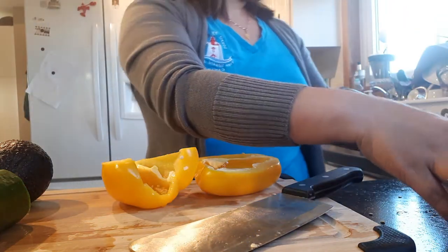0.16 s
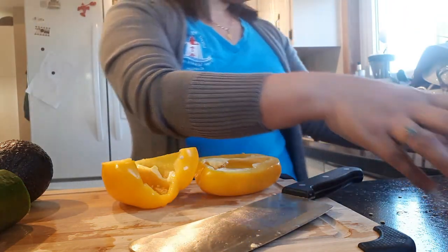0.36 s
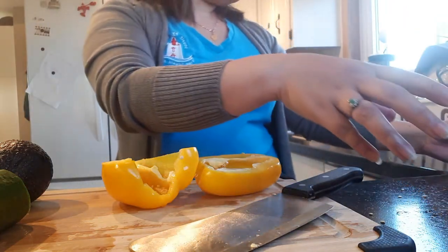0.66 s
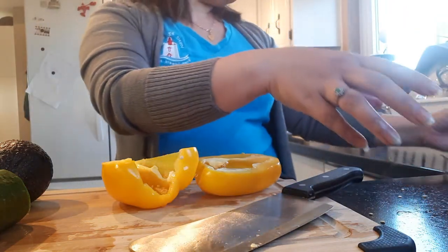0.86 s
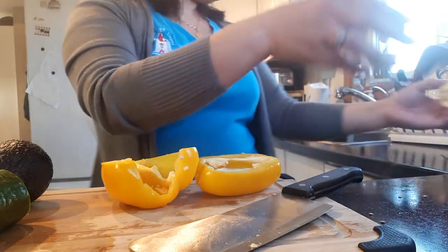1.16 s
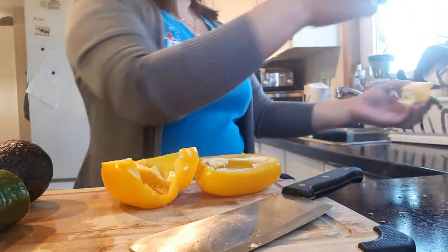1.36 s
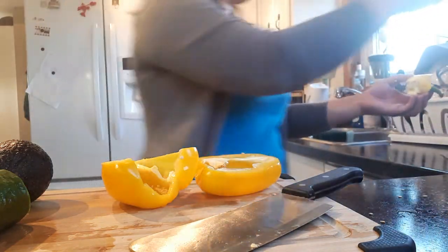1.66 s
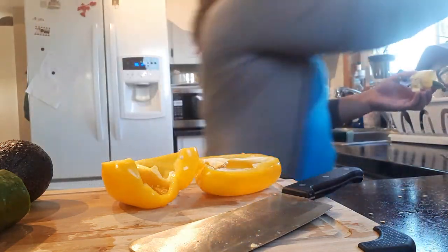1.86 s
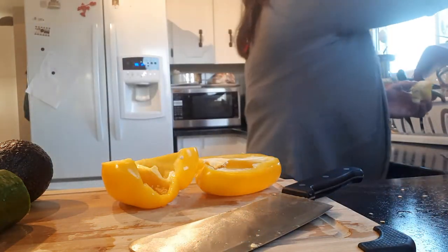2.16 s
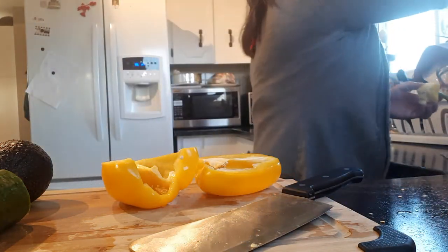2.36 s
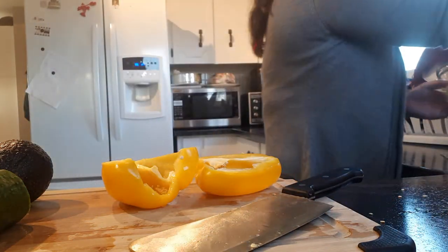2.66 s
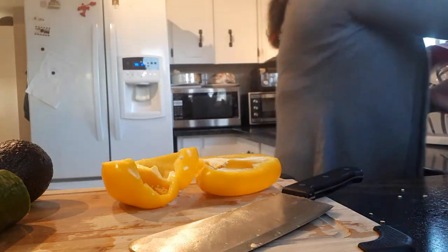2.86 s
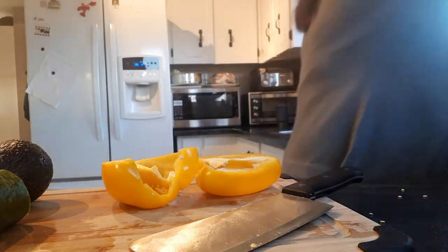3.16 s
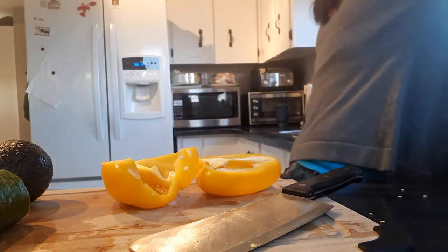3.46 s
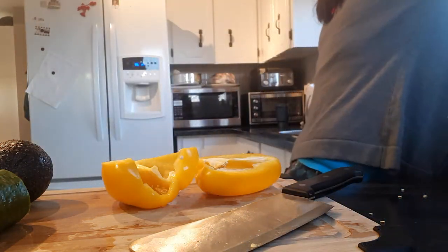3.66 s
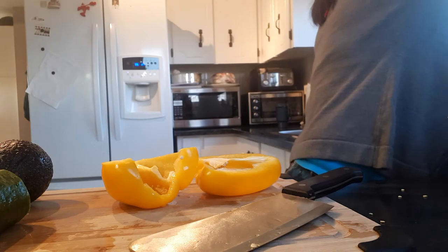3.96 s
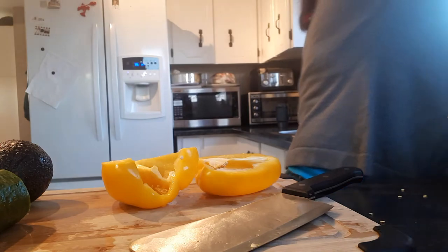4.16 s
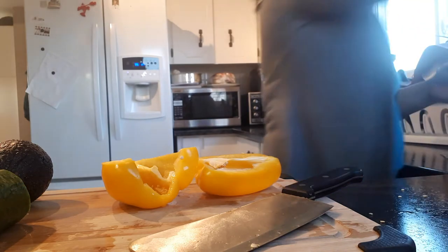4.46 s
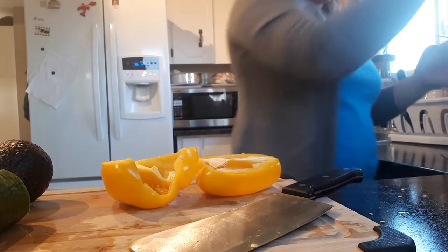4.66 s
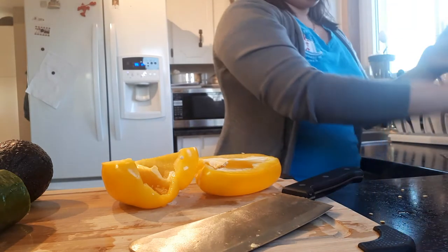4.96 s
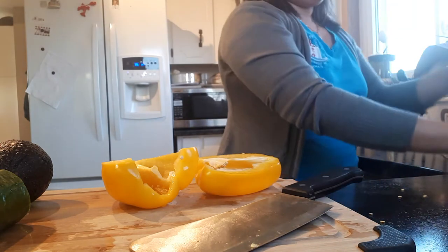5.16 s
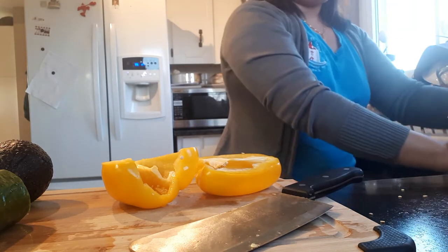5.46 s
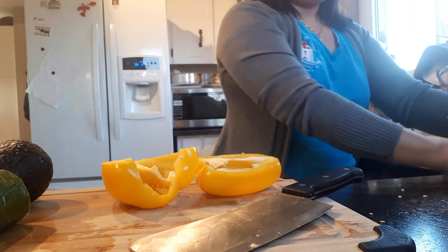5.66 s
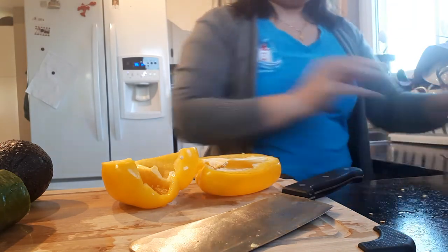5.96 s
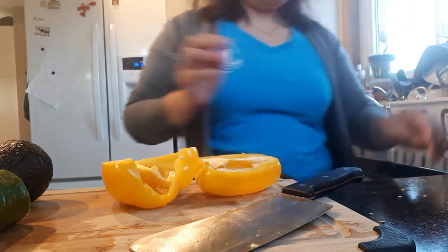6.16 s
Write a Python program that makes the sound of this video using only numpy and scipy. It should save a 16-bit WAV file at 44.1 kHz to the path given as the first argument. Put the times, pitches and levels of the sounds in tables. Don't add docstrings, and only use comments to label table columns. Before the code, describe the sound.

A faint low appliance hum and soft hiss run throughout a lively home kitchen, heard by two spaced microphones close on the counter. From 0 to 0.75 s a thin, fluttering tap jet hisses, then shuts with a tiny metallic click. Soft, dull drain gurgles blip irregularly, densest until about 1.9 s and sparser later. Around 2.1 s cloth brushes; at 2.2-2.4 s a cupboard opens with hollow low thumps and ringing panels. Light touches and faint rustling follow. At 3.57-3.72 s a bin is struck in a tight cluster of woody knocks with a short plastic crinkle and steel rattle, then handling fades by 4.1 s. From 4.65 to 5.05 s a hinge gives a rough, bright squeak, easing off. At 5.08 s the door slams very loudly, rebounding at 5.13 s with a short boom. Small clicks follow to 5.5 s; a moderate counter knock lands at 5.66 s, a tiny nail tick at 5.82 s, then hum until 6.3 s.

```python
import sys
import numpy as np
from scipy import signal
from scipy.fft import rfft, irfft
from scipy.io import wavfile

SR = 44100
rng = np.random.default_rng(int(sys.argv[2]) if len(sys.argv) > 2 else 0)


def field_ratio(decibels):
    return 10 ** (np.asarray(decibels, dtype=float) / 20)


def file_out(sig):
    cols = np.atleast_2d(sig).T
    lim = np.clip(cols, -1, 1)
    pcm = np.round(lim * 32767).astype(np.int16)
    wavfile.write(sys.argv[1], SR, pcm)


N = 277958

# f/Hz, density/dB per Hz
HUM_SPECTRUM = [(13, -47), (22, -30.5), (49, -13.5), (76, -43.5), (139, -0.5), (210, -9), (276, -7),
                (465, -6.5), (665, -10.5), (900, -33.5), (977, -23), (1220, -29.5), (2360, -36),
                (5230, -45.5), (15700, -46)]
# t/s, level/dB
HUM_LEVEL = [(0.0, -53.5), (1.02, -57), (1.16, -54.5), (1.9, -55), (2.88, -57.5), (3.45, -56.5),
             (3.7, -54.5), (4.14, -57.5), (4.37, -61.5), (4.65, -55), (5.03, -60.5), (5.4, -60.5),
             (5.84, -62), (6.3, -54)]
# t/s, jet level/dB
TAP_FLOW = [(0.0, -78), (0.038, -73), (0.098, -62.5), (0.15, -59), (0.29, -65), (0.366, -58.5),
            (0.634, -60), (0.69, -66), (0.75, -78)]
# f/Hz, density/dB per Hz
TAP_SPECTRUM = [(530, -41), (900, -5), (990, -3), (1260, -6.5), (1520, 3), (2340, -1.5), (5220, -1.5),
                (9160, -10), (11800, -7.5), (15700, -12)]
# t/s, peak level/dB, weight/dB, hardness/dB
THUMPS = [
    (0.036, -36, -4.5, 9.5),
    (2.205, -28, -1, -26),
    (2.267, -27.5, -5.5, 7),
    (2.394, -36.5, -4, -1),
    (3.065, -44.5, -1.5, 19.5),
    (3.571, -22.5, -3, 12),
    (3.929, -36.5, -1, -2),
    (5.661, -24.5, -0.5, -24),
]
# t/s, peak level/dB, weight/dB, hardness/dB
KNOCKS = [(0.829, -36.5, -15, 10.5), (1.024, -47, -3, -10), (1.32, -46.5, -12, -1), (2.299, -34, 3, -10),
          (3.603, -17.5, 2.5, 9.5), (3.639, -17.5, -1.5, 1), (3.667, -34, 2, 0), (3.713, -27, -5, 6),
          (5.635, -46, 7, 16), (5.774, -58, -2, 4), (5.82, -49, 15.5, -9)]
# t/s, peak level/dB, weight/dB, hardness/dB
CLICKS = [
    (0.757, -44, -3, 24),
    (2.491, -46.5, -8, 5.5),
    (3.43, -45.5, -8, -1.5),
    (5.334, -33, 12.5, -14),
    (5.431, -34.5, -12, -10.5),
    (5.481, -36.5, 3, -1),
    (5.709, -44.5, 10, -1),
]
# t/s, peak level/dB, weight/dB, hardness/dB
SLAM = [
    (5.080, 3, -1.5, 1),
    (5.086, -10, -8, 4),
    (5.095, -15.5, 8, 4.5),
    (5.102, -15.5, -2, 3.5),
    (5.115, -19, -13, 2),
    (5.134, -3, 0.5, 3),
    (5.143, -16, -7, -9),
    (5.152, -23.5, -13.5, 3.5),
]
BLOW_EDGES_HZ = [130, 420, 1400, 4000, 15500]
SLAM_EDGES_HZ = [150, 500, 1400, 2800, 14500]
# f/Hz, level/dB, T60/s
DOOR_MODES = [(134.8, -12, 1), (212.5, -15.5, 0.37), (590, -7, 0.56), (685, -6, 0.32), (1054, -17.5, 1.1),
              (1032, 7, 1.4), (1183, -4, 0.043), (1372, 6.5, 0.17), (1680, -12, 0.059), (1876, 5.5, 0.11),
              (2150, -6, 0.17), (2554, -3.5, .2)]
# t/s, peak level/dB, f/Hz
GURGLES = [(0.054, -35, 192), (0.253, -44.5, 666), (0.38, -44.5, 138), (0.551, -35.5, 720),
           (0.62, -49, 188), (0.829, -43.5, 205), (1.024, -35, 324), (1.081, -38, 320), (1.179, -48, 648),
           (1.266, -42.5, 643), (1.322, -41, 282), (1.43, -37.5, 374), (1.547, -36, 512), (1.759, -38, 278),
           (1.815, -35.5, 294), (1.914, -38.5, 186), (2.397, -34, 260), (2.587, -45, 316),
           (2.633, -40.5, 387), (2.67, -42.5, 510), (3.033, -40.5, 502), (3.151, -42, 280),
           (3.212, -50, 487), (3.387, -44, 255), (3.453, -39, 285), (4.084, -40.5, 124), (4.321, -41, 265),
           (4.44, -34.5, 311), (5.844, -39, 242), (6.179, -43, 186)]
# f/Hz, level/dB, T60/s
PIPE_MODES = [(678, 2, 0.093), (958, -15.5, 0.086), (501, -4, .07), (303, -1, 0.059)]
# t/s, peak level/dB
PIPE_KNOCKS = [(0.125, -49), (0.258, -48.5), (0.552, -37.5), (0.615, -44.5), (0.712, -56), (0.941, -45.5),
               (1.024, -50), (1.089, -50), (1.182, -48), (1.264, -43.5), (1.322, -52), (1.393, -56),
               (1.433, -48), (1.479, -49), (1.553, -58), (1.598, -48.5), (1.642, -57), (1.819, -51),
               (1.912, -50), (3.007, -57), (5.974, -54)]
# f/Hz, strike level/dB, rebound level/dB, T60/s
DOOR_NEAR = [(132, -22, -22, 0.21), (206, -16.5, -21.5, 0.31), (285, -17.5, -22.5, .2),
             (340, -15.5, -20.5, .22), (430, -11.5, -25, 0.22), (583, -24.5, -18, .2),
             (696, -21, -22, 0.22), (974, -14.5, -17, .25), (1110, -19, -15, 0.17), (1275, -21, -24.5, .27),
             (1360, -20, -24, 0.25), (1823, -17, -23.5, .22), (2000, -19, -26, 0.2),
             (2500, -20.5, -25.5, .14)]
# t/s, f/Hz, level/dB, T60/s
CARCASS = [(5.0813, 218, -14, .09), (5.092, 124, -12.5, .16), (5.083, 2050, -18, .04),
           (5.107, 270, -16, .1), (5.083, 3000, -28, .06), (5.082, 3800, -30, .05), (5.1, 1815, -21, .08),
           (5.175, 237, -21.5, .12), (5.21, 319, -31, .2), (5.22, 1287, -32, .25), (5.082, 340, -7.5, .025),
           (5.097, 415, -10, .1), (5.102, 1037, -17, .08), (5.113, 370, -13, .08),
           (5.135, 3750, -27.5, .03), (5.205, 1100, -33, .25), (5.23, 1794, -36, .2),
           (5.255, 1006, -39, .1)]
# t/s, f/Hz, level/dB, T60/s
NEAR_STRIKES = [(.765, 2500, -50, .06), (.762, 2200, -54, .04), (.76, 6900, -49, .03), (2.19, 211, -32, 0.17),
                (2.207, 323, -35, 0.12), (2.222, 482, -38, .15), (2.264, 122.1, -22, 0.25),
                (2.268, 2460, -34, .05), (2.268, 2800, -39, .04), (2.268, 773, -39, 0.14), (2.24, 526, -35, 0.11),
                (2.225, 1420, -41, 0.17), (2.268, 450, -34.5, 0.13), (2.299, 190.2, -31.5, 0.25),
                (2.302, 119, -27, 0.13), (2.3, 520, -36, .12), (2.397, 272, -35.5, 0.085), (3.553, 388, -31, 0.2),
                (3.57, 203, -25, 0.16), (3.572, 653, -27.5, 0.099), (3.602, 205, -18.5, 0.15),
                (3.602, 362, -29, 0.074), (3.604, 953, -26.5, 0.13), (3.605, 1370, -32, 0.21),
                (3.634, 203, -23, .12), (3.635, 490, -35, .08), (3.573, 2500, -33, .05), (3.632, 816, -27, 0.13),
                (3.635, 2840, -32, 0.066), (3.652, 119.6, -26, 0.24), (3.66, 1104, -34, 0.088),
                (3.705, 126, -29, 0.18), (3.72, 942, -38, .15), (3.722, 1770, -46, .12), (5.649, 200, -33, 0.086),
                (5.652, 484, -31, 0.064), (5.661, 332, -16, 0.057), (5.662, 1017, -33, .1),
                (5.663, 720, -34, 0.088), (5.664, 1310, -42.5, 0.077), (5.665, 134, -30.5, 0.27),
                (5.673, 522, -24.5, 0.067), (5.687, 430, -28, 0.11), (5.7, 218, -36, 0.22),
                (5.76, 692, -48, 0.24), (5.82, 239.4, -43.5, 0.22),
                (.775, 2550, -48, .07), (.822, 2300, -50, .09), (.832, 1450, -50, .05), (3.61, 2600, -34, .12),
           (3.735, 930, -36, .08), (3.725, 1780, -42, .15), (3.86, 1000, -42, .1), (5.65, 1700, -47, .03),
           (5.659, 2050, -39, .05), (5.675, 1500, -38, .04), (.76, 9050, -59, .5), (5.638, 5280, -62, .15),
           (5.725, 5280, -61, .15), (5.848, 660, -43, .15), (5.821, 7600, -41, .008),
           (5.821, 6400, -46, .008), (5.821, 12000, -38, .006), (5.772, 5000, -57, .012)]
# f/Hz, left minus right level/dB
NEAR_PAN = [(60, 0.5), (180, -1.0), (550, 2.0), (1650, -1.0), (4970, 2.5), (15000, 1.5)]
# t/s, peak level/dB, swell/s, fade/s
BOOMS = [(.212, -30.5, 0.042, 0.034), (.33, -62, 0.12, .3), (.55, -30.5, 0.013, 0.054),
         (2.2, -35.5, 0.027, 0.22), (2.298, -26.5, 0.041, 0.16), (2.508, -36, 0.038, 0.16),
         (3.584, -25, 0.13, 0.084), (3.65, -27.5, 0.046, 0.17), (3.845, -27, 0.17, 0.15),
         (4.102, -33.5, 0.22, 0.16), (4.49, -32, 0.036, 0.076), (4.68, -52, 0.34, .05),
         (5.11, -19, 0.014, 0.15), (5.17, -17.5, 0.058, 0.029), (5.678, -28.5, 0.043, 0.12),
         (5.95, -46, 0.086, .02)]
# t/s, peak level/dB, swell/s, fade/s
SHAKES = [
    (.264, -64, .09, 0.23),
    (2.17, -71, .03, .1),
    (2.378, -57, .12, 0.072),
    (2.5, -66, 0.096, 0.51),
    (3.61, -70, .1, .09),
    (3.994, -71, .2, 0.37),
    (4.46, -60, 0.038, 0.14),
    (4.68, -70, 0.24, .05),
    (5.11, -47.5, 0.011, 0.19),
    (5.69, -50.5, 0.019, .17),
]
# t/s, f/Hz, level/dB, touch/s
STEEL_TOUCHES = [(.815, 2150, -37.5, 0.021), (1.03, 1570, -45.5, 0.069), (1.17, 1520, -48.5, 0.045),
                 (1.33, 1606, -50, 0.072), (1.47, 1490, -51.5, 0.018), (1.96, 1460, -42, 0.11),
                 (2.267, 2500, -43, 0.0031), (2.8, 2400, -55, .06), (3.01, 1580, -56, .05),
                 (3.573, 2440, -27.5, 0.0023), (3.72, 1780, -40, 0.019), (3.84, 970, -33.5, 0.14),
                 (3.86, 2550, -53, 0.083), (3.93, 2820, -48, .023), (3.96, 1577, -42.5, 0.1),
                 (4.58, 1710, -57, 0.072), (5.64, 5210, -50, 0.027), (5.661, 2033, -39, 0.0054),
                 (5.66, 1030, -33, 0.0103), (5.659, 343, -29, 0.0045), (5.66, 1550, -35, 0.015),
                 (5.71, 5250, -57, 0.015)]
# t/s, f/Hz, level/dB, touch/s
TAP_STEEL = [
    (.77, 9050, -52, .03),
]
# t/s, f/Hz, level/dB, touch/s
SHELVES = [
    (5.083, 200, -23, .01),
    (5.09, 1000, -18.5, 0.0088),
    (5.083, 1990, -19.5, 0.0041),
    (5.088, 1770, -19.5, .02),
    (5.135, 1140, -19.5, 0.0074),
    (3.6, 195, -30, 0.029),
    (2.205, 338, -30.5, 0.032),
]
# t/s, f/Hz, level/dB, touch/s
NAIL_TICK = [
    (5.821, 12000, -49, 0.00026),
    (5.821, 7000, -43, 0.00012),
]
# t/s, peak level/dB, swell/s, fade/s, brightness/dB
RUBS = [(.772, -48, 0.013, 0.12, -1), (1.034, -65, .04, .32, -8.5), (1.32, -62.5, 0.04, 0.23, -9),
        (2.072, -47.5, .11, 0.32, -9), (2.212, -45, 0.046, 0.14, 0.5), (2.268, -42, 0.0092, 0.055, -13),
        (2.47, -59.5, 0.67, 0.031, -10), (2.64, -75, 0.033, 0.13, -7), (2.86, -62.5, 0.093, 0.081, -8),
        (3.07, -70, .1, 0.13, 1), (3.22, -69.5, 0.033, 0.53, -3.5), (3.438, -64.5, 0.03, 0.57, -1.5),
        (3.578, -37.5, 0.013, 0.13, -1.5), (3.615, -31, 0.035, 0.078, -6.5), (3.66, -48, 0.056, 0.11, -9),
        (3.978, -52, 0.11, 0.089, -5), (4.4, -66.5, 0.52, 0.74, -6), (5.82, -84, .02, 0.32, -3),
        (6.21, -77, .04, 0.1, -4)]
# f/Hz, density/dB per Hz
RUB_SPECTRUM = [(470, -50), (800, -3), (1780, -8.5), (1930, -13.5), (2860, -2.5), (7190, -11.5),
                (8850, -10.5), (11000, -11), (13400, -23.5), (15000, -33)]
# t/s, peak level/dB, swell/s, fade/s
CRINKLES = [
    (2.2, -42, 0.012, 0.15),
    (2.27, -50, .006, 0.046),
    (3.078, -67, .02, .06),
    (3.438, -70, .03, .1),
    (3.612, -33, .01, .025),
]
# t/s, level/dB
HINGE_FRICTION = [
    (4.55, -98),
    (4.64, -87),
    (4.675, -52),
    (4.72, -50.5),
    (4.8, -54),
    (4.86, -56),
    (4.97, -61),
    (5.03, -66),
    (5.076, -65),
]
# f/Hz, width/Hz, level/dB
HINGE_BODY = [(980, 47, -5), (1622, 270, -4.5), (2030, 400, 1), (2380, 280, 3.5), (3250, 200, -3),
              (3640, 260, 0), (4200, 220, 0), (5290, 220, -13), (5630, 66, -12.5), (6730, 280, -14.5),
              (8050, 230, -33)]
# low f/Hz, high f/Hz, level/dB, sounding until t/s
HINGE_EARLY = [
    (900, 1080, -11, 4.84),
    (1450, 1950, -4, 4.85),
    (3400, 4400, -5, 4.8),
]
# t/s, level/dB, f/Hz
WHINE = [
    (4.44, -75, 1480),
    (4.5, -72, 1500),
    (4.6, -70, 1680),
    (4.67, -60, 1780),
    (4.71, -66, 1790),
]
# f/Hz, correlation/1
LIKENESS = [(30, .95), (130, .95), (290, .6), (640, -.03), (1400, -.15), (3000, 0), (15000, 0)]
# f/Hz, T60/s
ROOM_T60 = [(60, 0.073), (250, 0.24), (1000, 0.42), (3000, 0.48), (8000, 0.35), (15000, 0.2)]
# f/Hz, gain/dB
MICROPHONE = [(20, -25.5), (60, -15.5), (110, -4.5), (4000, -3.5), (7600, -2), (8500, -13.5), (12000, -13),
              (16000, -17)]

THUMP_DB, KNOCK_DB = (6.5, -11, -7.5, -16.5), (-6, -2.5, -14, -14.5)
CLICK_DB, SLAM_DB = (-12.5, -14.5, -3.5, -7.5), (-11.5, -9.5, -5.5, -19)


def rms_one(x):
    return x / np.sqrt(np.mean(x ** 2) + 1e-20)


def in_time(table):
    first, last = table[0], table[-1]
    rows = [(first[0] - .02, -120, *first[2:]), *table, (last[0] + .004, -120, *last[2:])]
    s, *columns = np.transpose(rows)
    return [np.interp(np.arange(N) / SR, s, c) for c in columns]


def at_hz(points, hz):
    point_hz, value = np.array(points).T
    return np.interp(np.log(hz), np.log(point_hz), value)


def band(x, low_hz, high_hz):
    sos = signal.butter(2, [low_hz, min(high_hz, .45 * SR)], "band", fs=SR, output="sos")
    return signal.sosfilt(sos, x)


def drift(rate_hz):
    r = np.exp(-80 * np.pi * rate_hz / SR)
    white = rng.standard_normal(N // 40 + 2002)
    slow = signal.lfilter([1], [1, -2 * r, r * r], white)[2000:]
    return np.interp(np.arange(N) / 40, np.arange(len(slow)), rms_one(slow))


def ring(clicks, hz, t60_s):
    r, w = field_ratio(-60 / (t60_s * SR)), 2 * np.pi * hz / SR
    return signal.lfilter([0, np.sin(w)], [1, -2 * r * np.cos(w), r * r], clicks + 1e-18)


def stereo_noise():
    mid, side = rfft(rng.standard_normal((2, N)))
    alike = np.clip(at_hz(LIKENESS, np.arange(len(mid)) * SR / N + 1), -1, 1)
    both = np.sqrt(1 + alike) * mid + np.sqrt(1 - alike) * side * [[1], [-1]]
    return irfft(both, N) / np.sqrt(2)


def colour(x, spectrum):
    tones = rfft(x)
    hz = np.arange(tones.shape[-1]) * SR / N + 1
    return irfft(tones * field_ratio(at_hz(spectrum, hz)), N)


def swells(table):
    s, db, swell_s, fade_s = np.array(table).T[:4, :, None]
    t = np.arange(0, N + 32, 32) / SR - s
    slope = np.minimum(t / np.maximum(swell_s, 1e-3), -t / np.maximum(fade_s, 1e-3))
    return field_ratio(db + 20 * slope)


def at_samples(gains):
    return np.interp(np.arange(N) / 32, np.arange(gains.shape[1]), gains.sum(axis=0))


def hum():
    noise = rms_one(colour(stereo_noise(), HUM_SPECTRUM))
    low = signal.sosfilt(signal.butter(2, 1100, fs=SR, output="sos"), noise)
    lumps_db = 2.5 * drift(24)
    level_db = 4.0 + np.interp(np.arange(N) / SR, *np.transpose(HUM_LEVEL))
    return field_ratio(level_db + lumps_db) * low + field_ratio(-53.0) * (noise - low)


def tap():
    jet_db, = in_time(TAP_FLOW)
    low_db = -3.5 + 0.98 * np.clip(-65.0 - jet_db, 0, 20)
    hiss = colour(stereo_noise(), TAP_SPECTRUM)
    jet = rms_one(band(hiss, 2300, 7600))
    jet = jet - field_ratio(-8.5) * rms_one(band(hiss, 8000, 16500))
    jet = jet + field_ratio(low_db) * rms_one(band(hiss, 900, 3200))
    left_right = field_ratio([[1.3], [-1.3]])
    return field_ratio(jet_db + 4.5 + 1.0 * drift(13)) * jet * left_right


def contacts(table, kind_db):
    clack_share = 0.39
    return [(s, db, *(np.array(kind_db) + [weight, 0, clack_share * hard, hard]))
            for s, db, weight, hard in table]


def blows(table, edges_hz, contact_s, wood_db):
    rows = np.array(table)
    at = ((rows[:, 0] + .002) * SR).astype(int)
    t = np.arange(SR // 20) / SR
    spray = .03 * rng.standard_normal((len(at), len(t))) * np.exp(-t / contact_s)
    spray[:, 0] = rng.choice([-1, 1], len(at))
    registers = np.zeros((4, N + len(t)))
    for k, i in enumerate(at):
        registers[:, i:i + len(t)] += field_ratio(rows[k, 1] + rows[k, 2:])[:, None] * spray[k]
    thud, panel, clack, tick = [band(x[:N] + 1e-18, low, high) * np.sqrt(SR / (high - low))
                                for x, low, high in zip(registers, edges_hz, edges_hz[1:])]
    knock = thud - panel + clack
    wood = sum(field_ratio(db) * ring(knock, hz, 0.17 * min(t60_s, .25)) for hz, db, t60_s in DOOR_MODES)
    return field_ratio(9.0) * (knock - field_ratio(-2.0) * tick + field_ratio(wood_db) * wood)


def drain():
    out, t = np.zeros(N + SR), np.arange(SR // 10) / SR
    low_hz, high_hz = 144, 493
    small = [(a * N / SR, -48 + 4 * b, low_hz * (high_hz / low_hz) ** c) for a, b, c in rng.random((16, 3))]
    pockets = GURGLES + small
    envelope = np.exp(-t / 0.0068) * (1 - np.exp(-t / 0.0015))
    for (s, db, hz), pipe in zip(pockets, rng.random(len(pockets))):
        blip = np.sin(2 * np.pi * hz * t * (1 + 0.73 * t))
        blip = blip + 1.3 * pipe * np.sin(2 * np.pi * (640 + 60 * pipe) * t)
        out[round(s * SR):][:len(t)] += field_ratio(db + 2.5) * blip * envelope
    return out[:N]


def near_wood():
    rise_cycles, left_lag_s, widest_turn_rad = 0.48, 0.0004, 1.64
    strikes_s = (5.0815, 5.135)
    door = [(s, row[0], row[1 + k], row[3]) for k, s in enumerate(strikes_s) for row in DOOR_NEAR]
    pipe = [(s, hz, db + mode_db + 3, t60_s) for s, db in PIPE_KNOCKS for hz, mode_db, t60_s in PIPE_MODES]
    out, t = np.zeros((2, N + SR)), np.arange(SR // 2) / SR
    for k, (s, hz, db, t60_s) in enumerate(door + CARCASS + NEAR_STRIKES + pipe):
        turn = min(2 * np.pi * hz * left_lag_s, widest_turn_rad) * np.array([[1], [0]])
        pan_db = at_hz(NEAR_PAN, hz) * np.array([[.5], [-.5]])
        swell = (1 - np.exp(-t * hz / rise_cycles)) * field_ratio(db - 60 * t / t60_s + pan_db)
        out[:, round(s * SR):][:, :len(t)] += (-1) ** k * swell * np.sin(2 * np.pi * hz * t - turn)
    return out[:, :N]


def rumble():
    noise = stereo_noise()
    boom = band(ring(noise, 118.2, 0.1) + 0.4 * ring(noise, 192.2, .1), 120.6, 600)
    shake = band(noise, 28, 100)
    booms = field_ratio(-15.0) * at_samples(swells(BOOMS)) * rms_one(boom)
    return booms + field_ratio(4.5) * at_samples(swells(SHAKES)) * rms_one(shake)


def metal():
    out, t = np.zeros(N), np.arange(SR // 4) / SR
    for table, t60_s in ((STEEL_TOUCHES, .013), (TAP_STEEL, 0.12), (SHELVES, .07), (NAIL_TICK, 0.003)):
        for s, hz, db, touch_s in table:
            rub = rng.standard_normal(len(t)) * np.exp(-t / touch_s)
            rub = rub / np.sqrt(np.sum(rub ** 2))
            out[round(s * SR):][:len(t)] += field_ratio(db) * ring(rub, hz, t60_s)
    return out


def rubbing():
    rub = swells(RUBS)
    bright = at_samples(rub * field_ratio(np.array(RUBS)[:, 4:]))
    squeak = field_ratio(-18) * bright + at_samples(swells(CRINKLES))
    hiss = colour(stereo_noise() * field_ratio(1.5 * drift(180)), RUB_SPECTRUM)
    parts = at_samples(rub) * rms_one(band(hiss, 1300, 2400))
    parts = parts + bright * rms_one(band(hiss, 3960, 8660))
    parts = parts + squeak * rms_one(band(hiss, 9600, 15600))
    return field_ratio(-0.5) * parts


def hinge():
    t = np.arange(N) / SR
    friction_db, = in_time(HINGE_FRICTION)
    folded_s, tightens_db_per_s, mutes_db_per_s, muted_db = 4.91, 200, 200, -8.5
    squeak_db = tightens_db_per_s * np.minimum(t - folded_s, 0)
    noise, body = stereo_noise() * field_ratio(.8 * drift(120)), 0
    for k, (hz, width_hz, db) in enumerate(HINGE_BODY):
        r = np.exp(-np.pi * width_hz / SR)
        poles = [1, -2 * r * np.cos(2 * np.pi * hz / SR), r * r]
        peak = signal.lfilter((1 - r * r) / 2 * np.array([1, 0, -1]), poles, noise)
        body = body + (-1) ** k * field_ratio(db) * peak
    arm = rms_one(band(body, 1700, 2700))
    arm = arm + field_ratio(squeak_db) * rms_one(band(body, 3110, 3360))
    arm = arm + field_ratio(-7) * rms_one(band(body, 4590, 9000))
    for low_hz, high_hz, db, until_s in HINGE_EARLY:
        mute_db = np.clip(mutes_db_per_s * (until_s - t), muted_db, 0)
        arm = arm + field_ratio(db + mute_db) * rms_one(band(body, low_hz, high_hz))
    whine_db, whine_hz = in_time(WHINE)
    rough = rms_one(band(noise, 10, 160))
    whine = field_ratio(whine_db) * rough * np.sin(2 * np.pi * np.cumsum(whine_hz) / SR)
    return field_ratio(friction_db + 5.0) * arm + whine


def room(x):
    t, noise, tail = np.arange(SR) / SR, stereo_noise()[:, :SR], 0
    mid = noise.mean(axis=0)
    noise = noise + 0.36 * band(mid, 90, 796) - .45 * band(noise - mid, 90, 800)
    for hz in 45 * 2. ** np.arange(9):
        tail = -tail + band(noise, hz, 2 * hz) * field_ratio(-60 * t / at_hz(ROOM_T60, np.sqrt(2) * hz))
    tail *= (1 - np.exp(-t / 0.0024)) * (1 + 1.8 * np.exp(-t / 0.041))
    tail *= field_ratio(4.5) / np.sqrt(np.sum(tail ** 2) / 2)
    tail[0, 22] += 1.1
    tail[1, 0] += .8
    return signal.fftconvolve(x[None], tail, axes=1)[:, :N]


def microphone(x):
    log_gain = np.log(field_ratio(at_hz(MICROPHONE, np.arange(4097) * SR / 8192 + 1)))
    cepstrum = irfft(log_gain)
    cepstrum[1:4096] *= 2
    cepstrum[4097:] = 0
    impulse = irfft(np.exp(rfft(cepstrum)))
    return signal.fftconvolve(x, impulse[None], axes=1)[:, :N]


def scene():
    gurgle = drain()
    handling = contacts(THUMPS, THUMP_DB) + contacts(KNOCKS, KNOCK_DB) + contacts(CLICKS, CLICK_DB)
    struck = blows(handling, BLOW_EDGES_HZ, .005, -56.5)
    struck = struck + field_ratio(-1.0) * blows(contacts(SLAM, SLAM_DB), SLAM_EDGES_HZ, 0.0025, -41.5)
    struck = struck + metal() + 0.64 * gurgle
    heard = microphone(room(struck) + rubbing() + near_wood())
    return heard + 0.39 * gurgle + tap() + hinge() + rumble() + hum()


def low_pass(x):
    return signal.sosfilt(signal.butter(12, 15750, fs=SR, output="sos"), x)


def record(dry):
    mix = np.tanh(dry / 2.515) * 2.485
    return low_pass(mix)


dry = scene()
out = record(dry)
file_out(out)
```